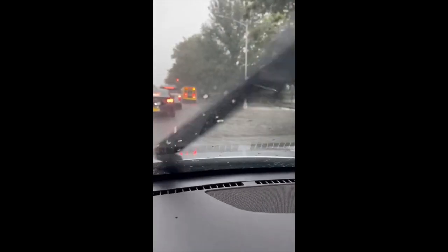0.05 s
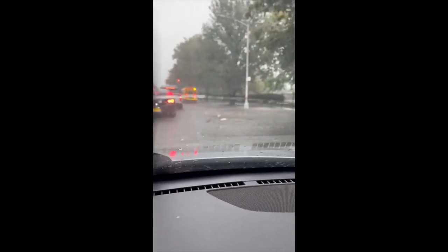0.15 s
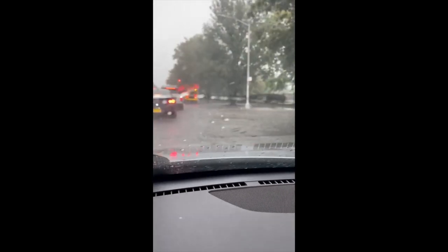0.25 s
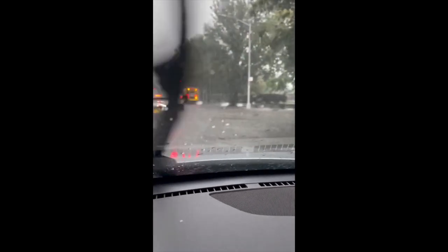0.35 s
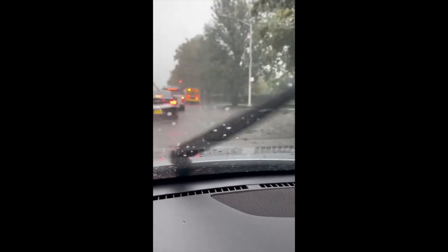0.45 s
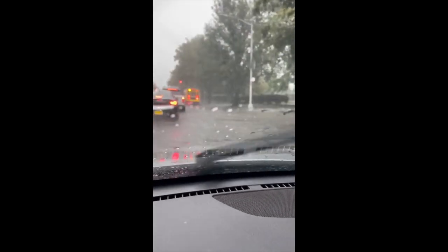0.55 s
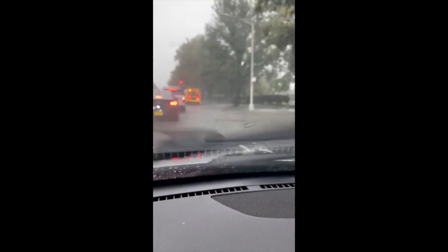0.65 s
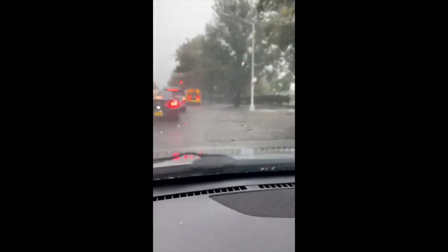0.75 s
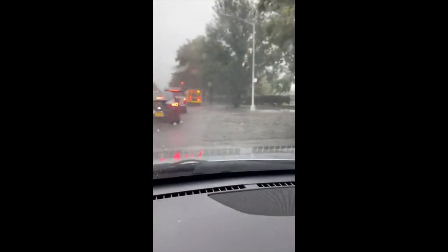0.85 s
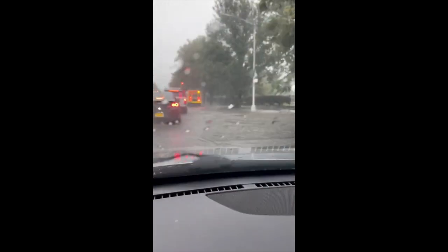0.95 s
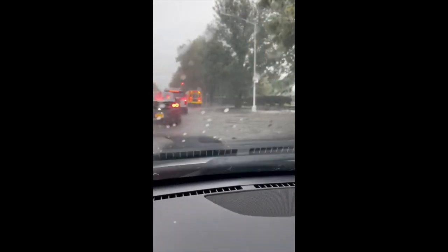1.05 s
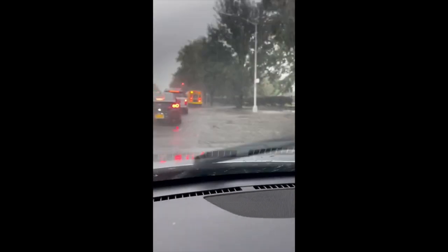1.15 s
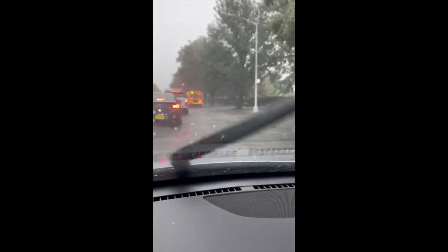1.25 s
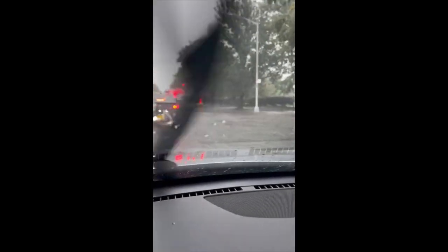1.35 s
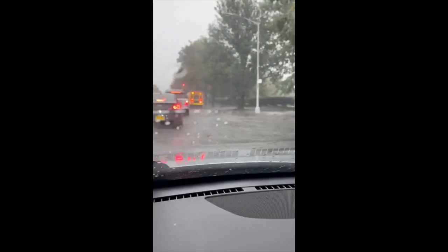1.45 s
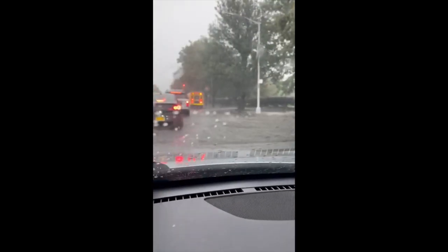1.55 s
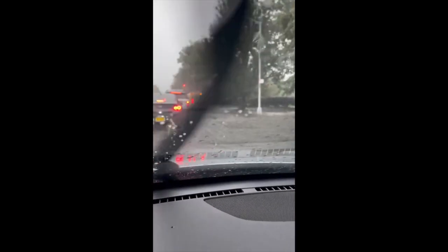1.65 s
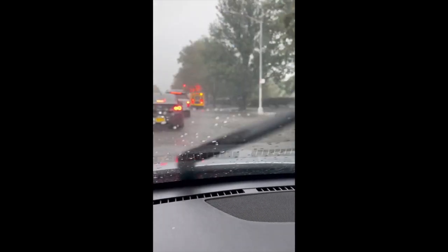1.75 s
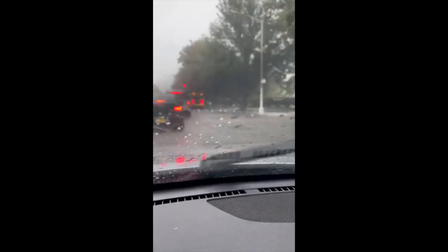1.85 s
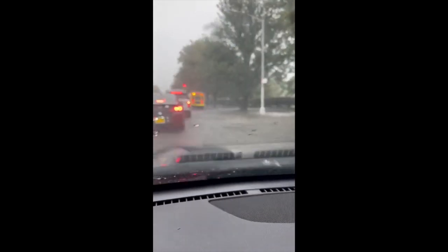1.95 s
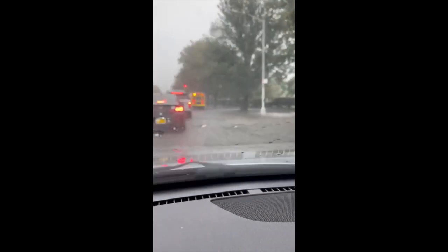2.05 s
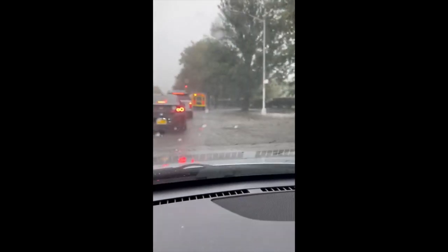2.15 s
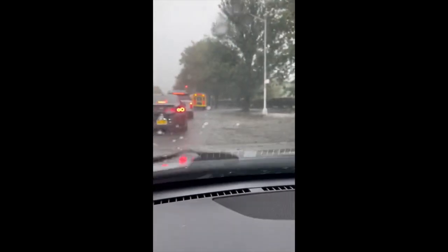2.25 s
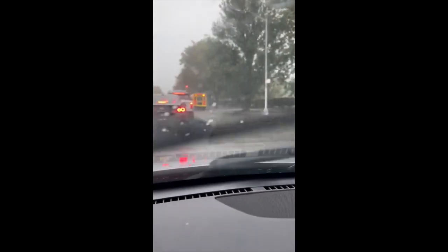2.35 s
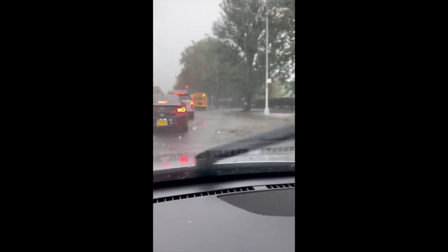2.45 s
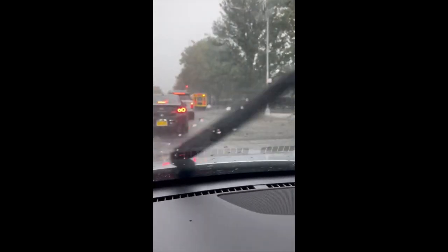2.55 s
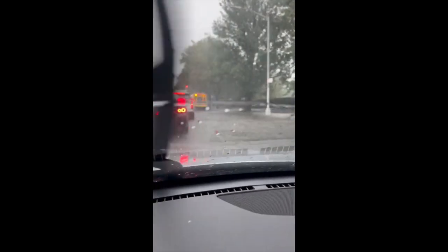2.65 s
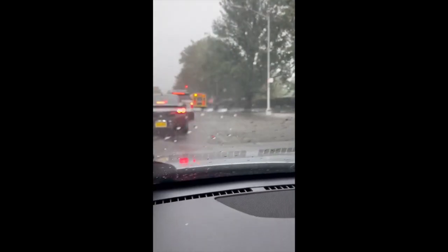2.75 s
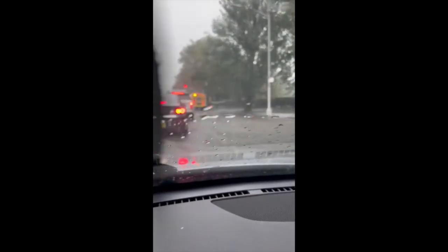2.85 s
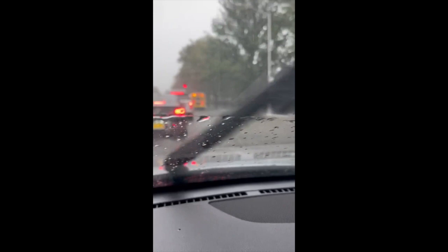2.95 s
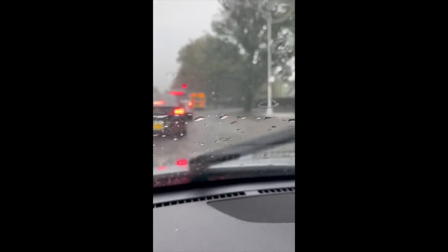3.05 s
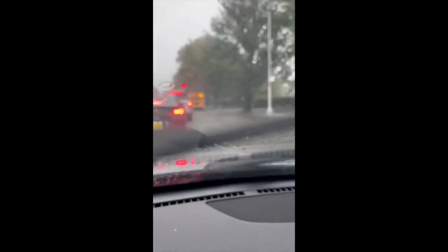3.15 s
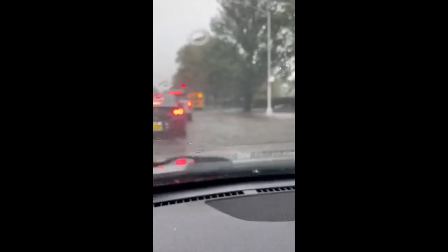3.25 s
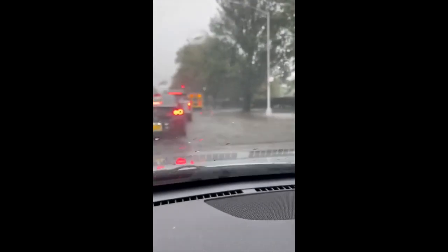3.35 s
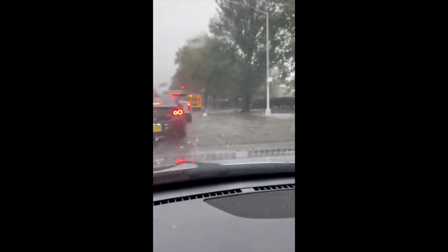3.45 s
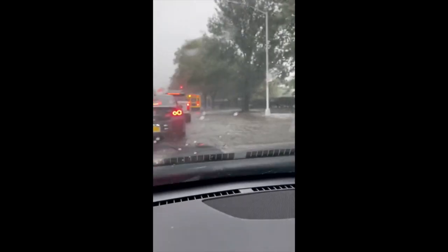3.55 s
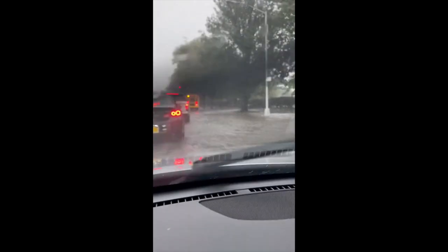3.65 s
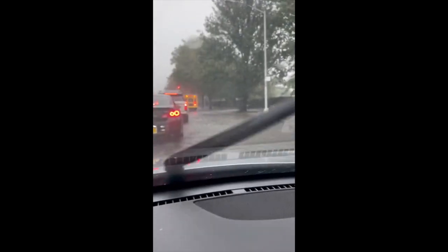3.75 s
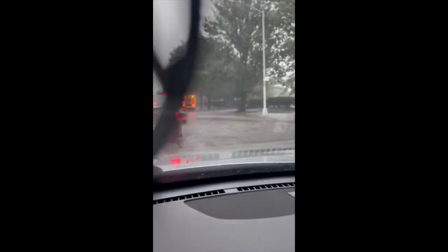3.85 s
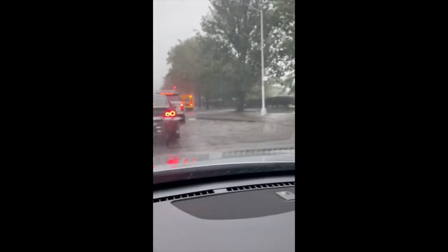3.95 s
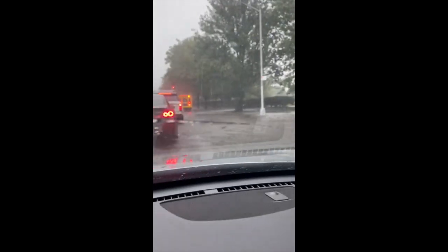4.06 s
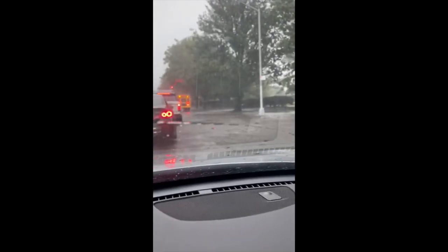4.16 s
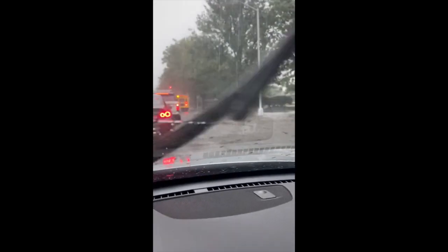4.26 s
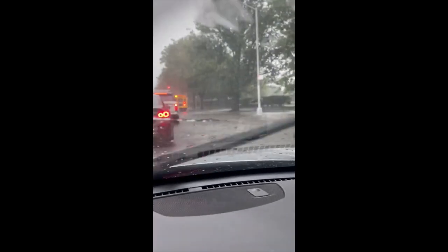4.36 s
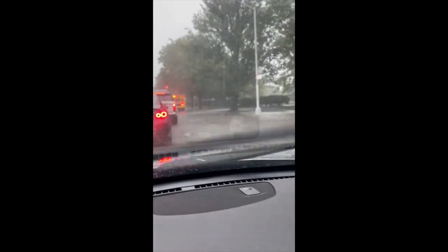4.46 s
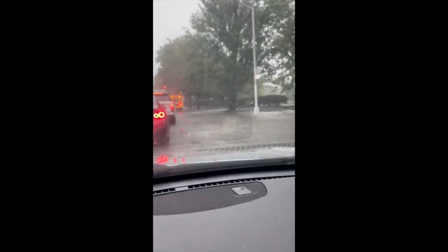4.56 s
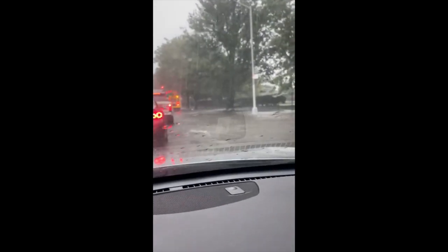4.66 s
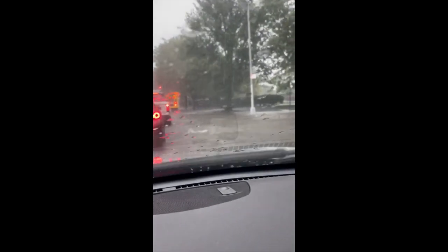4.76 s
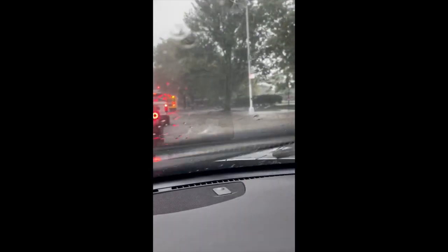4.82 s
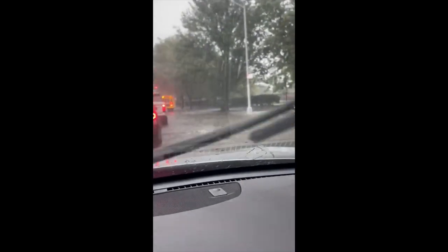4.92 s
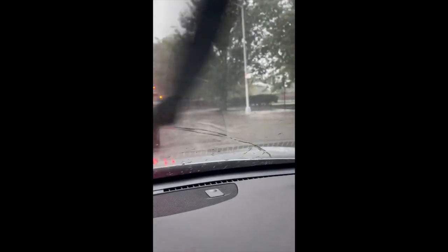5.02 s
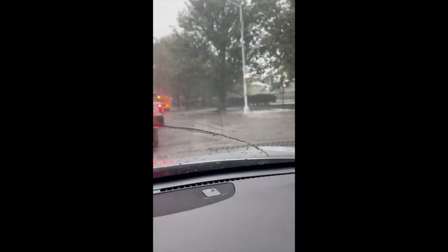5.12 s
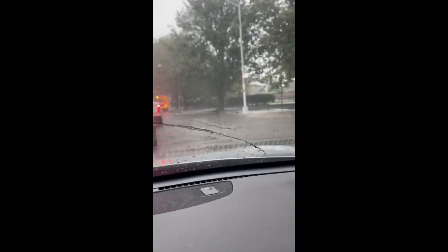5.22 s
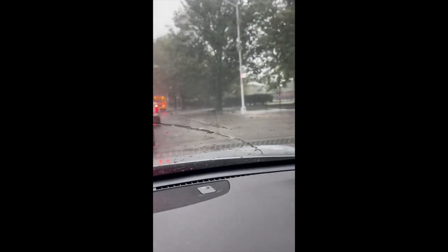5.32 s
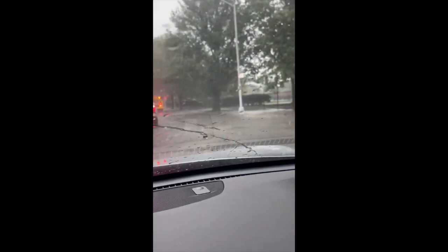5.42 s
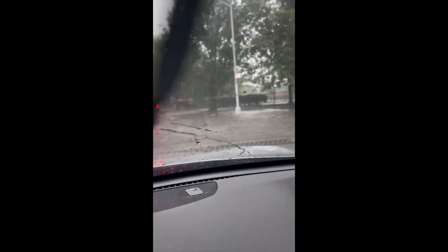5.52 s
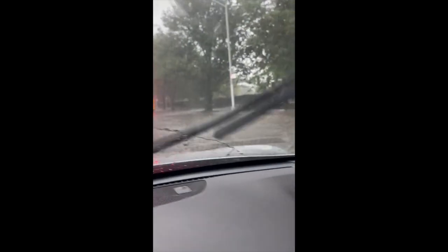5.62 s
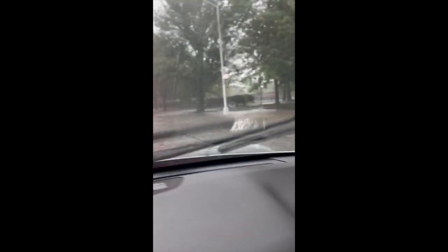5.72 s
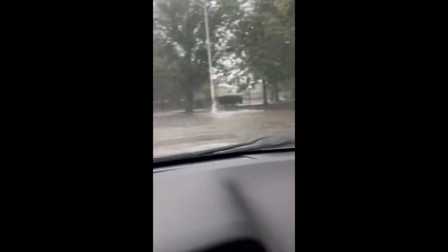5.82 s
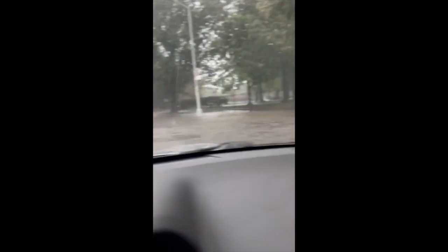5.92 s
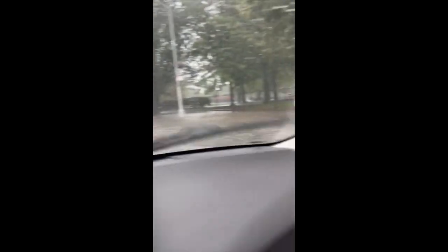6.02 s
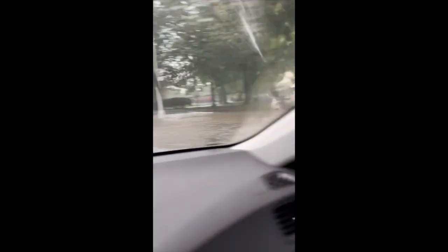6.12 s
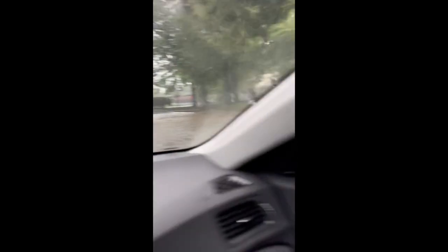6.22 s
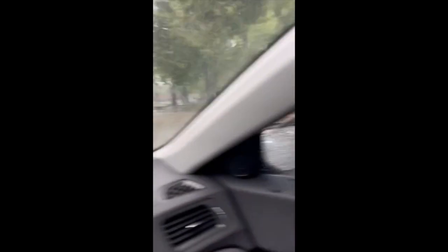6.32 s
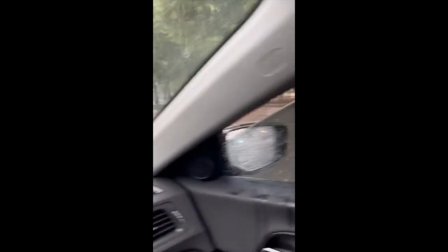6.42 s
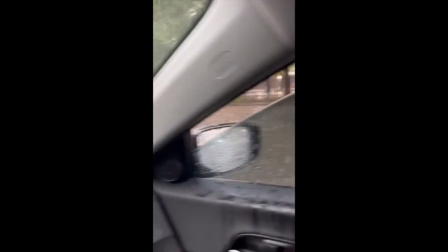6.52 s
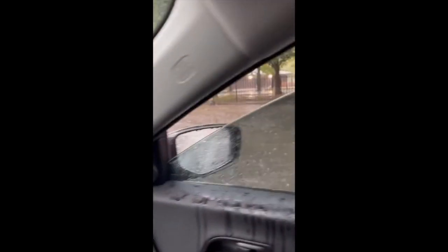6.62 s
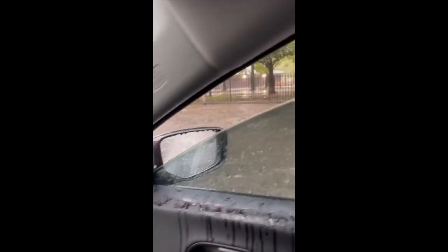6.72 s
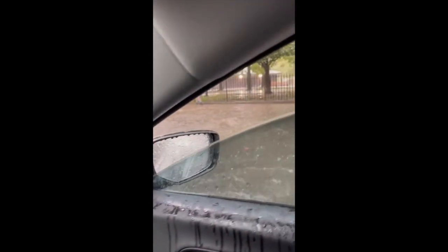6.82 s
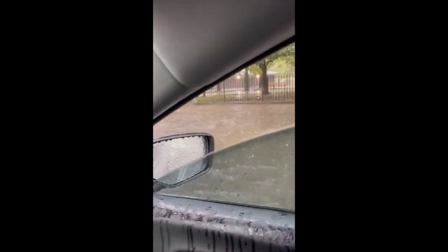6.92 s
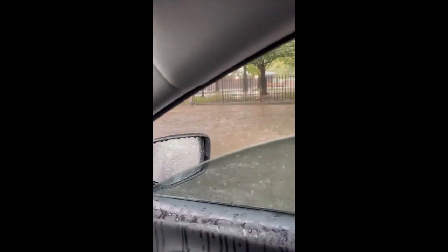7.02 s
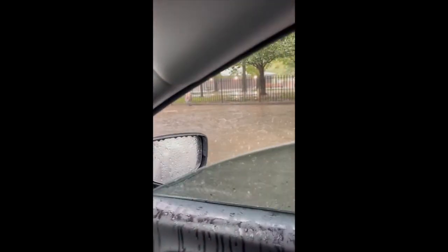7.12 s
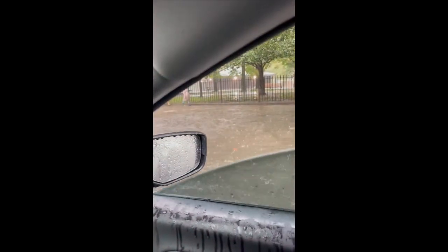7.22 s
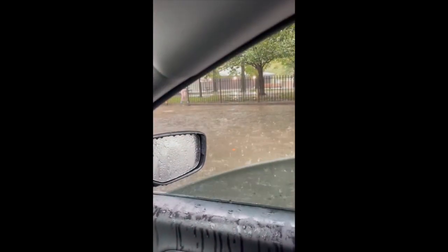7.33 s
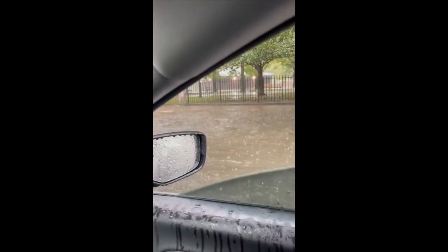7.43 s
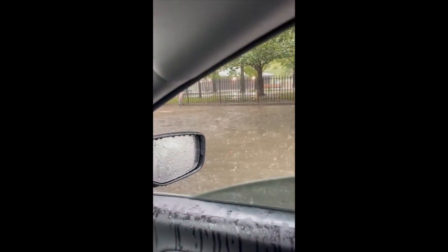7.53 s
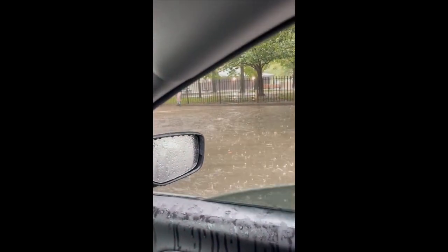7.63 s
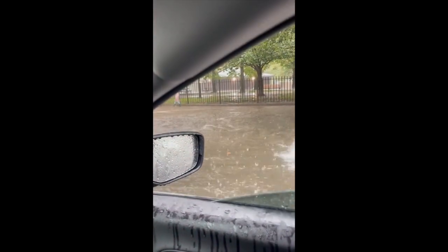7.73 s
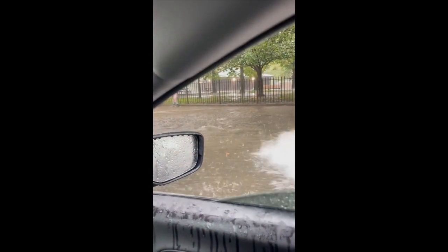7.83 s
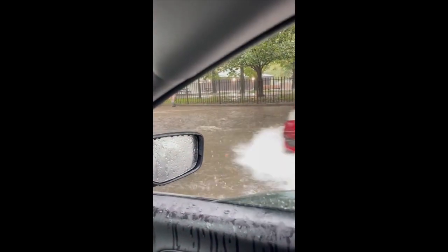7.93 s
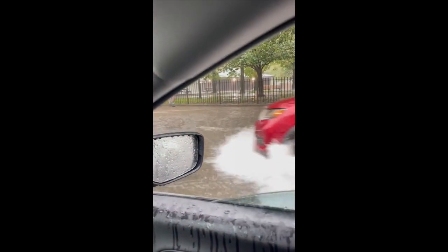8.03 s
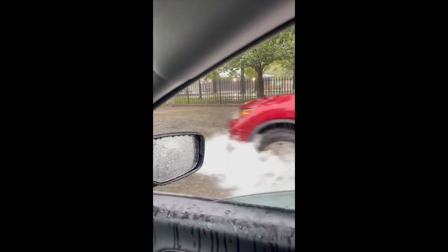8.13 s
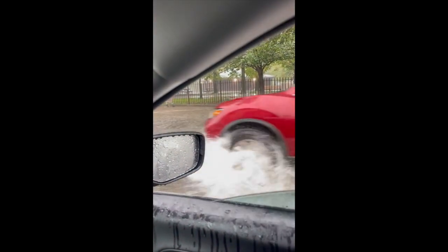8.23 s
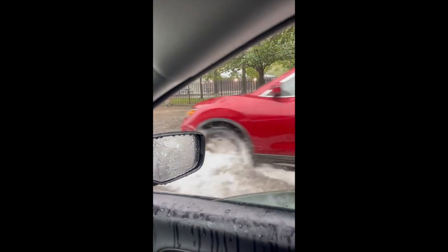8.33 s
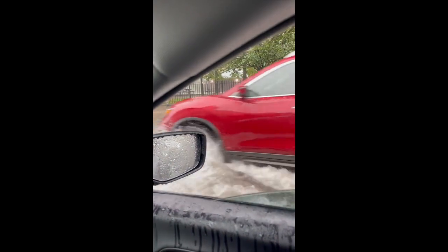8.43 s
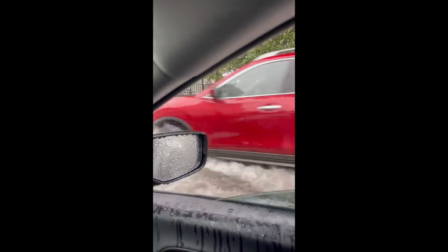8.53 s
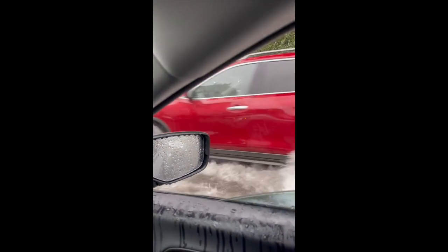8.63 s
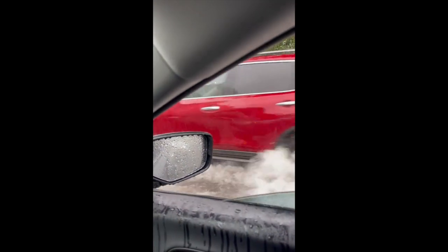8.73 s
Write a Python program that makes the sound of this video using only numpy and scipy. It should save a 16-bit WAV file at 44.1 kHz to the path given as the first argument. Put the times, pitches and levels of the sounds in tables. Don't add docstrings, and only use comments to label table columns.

```python
import sys
import numpy as np
from scipy import signal
from scipy.fft import rfft, irfft, next_fast_len
from scipy.io import wavfile

SR = 44100
rng = np.random.default_rng(int(sys.argv[2]) if len(sys.argv) > 2 else 0)


def invert_db(x):
    u = np.asarray(x, float) / 20
    return 10 ** u


def master(y):
    cut = np.clip(np.atleast_2d(y).T, -1, 1)
    pcm = np.round(cut * 32767)
    wavfile.write(sys.argv[1], SR, pcm.astype(np.int16))


N = 387191
SIZE = next_fast_len(N)
HZ = np.arange(SIZE // 2 + 1) * SR / SIZE + 1e-3
T = np.arange(N) / SR

# [turn_s, panel_db, body_db, rubber_db, water_db]
TOPS = [
    (0.245, -10.5, -17, -22.5, -41),
    (1.505, -9.5, -18, -22.5, -40),
    (2.765, -10.5, -17, -22, -40.5),
    (4.0273, -10, -21, -22.5, -41),
    (5.29, -12, -25, -27.5, -43.5),
    (6.562, -23.5, -24.5, -53, -50),
    (7.804, -26, -33, -21.5, -44),
]
# [turn_s, panel_db, body_db, rubber_db, water_db]
BOTTOMS = [
    (0.8545, -10, -13.5, -28.5, -32),
    (2.116, -9, -12.5, -28, -32),
    (3.3755, -9.5, -13.5, -29, -34),
    (4.6378, -13, -11.5, -32.5, -32.5),
    (5.902, -15.5, -16, -34, -35.5),
    (7.177, -19, -17.5, -26.5, -34),
    (8.431, -16, -15, -41, -34),
]


def rms_one(x):
    return x / np.sqrt(np.mean(x ** 2) + 1e-20)


def filtered(x, order, hz, kind):
    return signal.sosfilt(signal.butter(order, hz, kind, fs=SR, output="sos"), x)


def in_time(rows):
    s, *columns = np.transpose(rows)
    return [np.interp(T, s, c) for c in columns]


def at_hz(points, hz):
    table_hz, value = np.transpose(points)
    return np.interp(np.log(hz), np.log(table_hz), value)


def drift(rate_hz):
    r = np.exp(-80 * np.pi * rate_hz / SR)
    slow = signal.lfilter([1], [1, -2 * r, r * r], rng.standard_normal(N // 40 + 2002))[2000:]
    return np.interp(np.arange(N) / 40, np.arange(len(slow)), rms_one(slow))


def ring(force, hz, t60_s):
    r, w = invert_db(-60 / (t60_s * SR)), 2 * np.pi * hz / SR
    return signal.lfilter([0, np.sin(w)], [1, -2 * r * np.cos(w), r * r], force + 1e-18)


def swell(peak_s, rise_s, fall_s):
    at = np.arange(max(int((peak_s - .15) * SR), 0), min(int((peak_s + .2) * SR), N))
    t = T[at] - peak_s
    return at, np.exp(np.where(t < 0, t / max(rise_s, 1e-4), -t / max(fall_s, 1e-4)))


def drops(spectrum, per_s, uneven_db, patchy_db, gust_db):
    sizes = invert_db(uneven_db * np.minimum(rng.exponential(1, (2, N)), 6)) * rng.standard_normal((2, N))
    impacts = sizes * (rng.random((2, N)) < per_s / SR)
    shower = rfft(impacts, SIZE) * invert_db(at_hz(spectrum, HZ))
    together_db = gust_db * (drift(13.7) + 0.12 * drift(40))
    out = 0
    low, high = np.log2([spectrum[0][0], spectrum[-1][0]])
    for octave in np.arange(low, high + .5, .5):
        band = np.clip(1 - 2 * abs(np.log2(HZ) - octave), 0, 1)
        out = out + irfft(shower * band, SIZE)[:, :N] * invert_db(patchy_db * drift(13.6))
    return rms_one(out * invert_db(together_db))


def hum(rows, wobble_db, wander):
    hz, level_db = in_time(rows)
    on = np.clip(np.minimum(T - rows[0][0] + 0.077, rows[-1][0] + 0.053 - T) / 0.14, 0, 1)
    turns = np.cumsum(hz * (1 + wander * drift(11.0))) / SR
    return on * invert_db(level_db + 2 + wobble_db * drift(12.0)) * np.sin(2 * np.pi * turns)


def each_turn(top_parts, bottom_parts, *columns):
    rows = []
    for turns, parts in ((TOPS, top_parts), (BOTTOMS, bottom_parts)):
        for turn in turns:
            for part in parts:
                levels_db = [turn[c] + level_db for c, level_db in zip(columns, part[1:])]
                rows.append((turn[0] + part[0], *levels_db, *part[1 + len(columns):]))
    return rows


def wiper_knocks():
    # [after_turn_s, panel_db, body_db, direction]
    top_knocks = [
        (-.0005, -1, -13, 1),
        (.0125, -4.5, -4.5, -1),
        (.0565, -14, -6, -1),
        (.0735, 0, -3, -1),
        (.1415, -8, -8.5, -1),
    ]
    # [after_turn_s, panel_db, body_db, direction]
    bottom_knocks = [
        (0.002, -4, -0.5, 1),
        (.07, -8.5, -9, 1),
        (0.0994, 1.5, -14, -1),
        (.1235, -8, -4.5, 1),
        (0.1378, -1, -8, -1),
    ]
    firmness = [(0.5, -1.5, -5, 1, -1), (0.5, 1.5, 0, -0.5, -0.5), (-1, -0.5, 3.5, 0, -2),
                (1.5, -1.5, 1, -1.2, .3), (-0.5, 2, 2, -2.5, -0.5), (-4, .3, 3, 4, .3), (-7, 8, 4, .3, .3),
                (1.5, 1.5, -1.5, .3, -0.5), (0.7, -1, -2.2, 1, -1), (.3, .3, -0.2, 1, 1.8),
                (0, -1, 1.5, -2, -1), (1.5, -1, -0.5, -3, 0), (1.5, -4, -1, -5, -7), (-4, -1, .3, -4, 0)]
    # [start_s, panel_db, body_db, direction]
    jerks = [(5.4, -17, -20, 1), (1.4, -31, -24, 1), (6.1, -25, -17, -1), (11, -36, -20, 1),
             (8.665, -35, -25, 1), (4.752, -18, -32, -1), (5.297, -16, -37, 1), (6.1, -25, -20, 1),
             (7.19, -20, -20, 1), (5.966, -26, -18.5, 1), (6.05, -21, -26, -1), (6.128, -19, -23.5, 1),
             (6.155, -27, -29, 1)]
    # [mode_hz, level_db, t60_s]
    panel = [(144.5, -2, 0.2), (194, 5, 0.17), (221.2, 0, 0.2), (277, 1.5, 0.078), (313, 1.5, 0.04),
             (448, -10.5, 0.052)]
    # [mode_hz, level_db, t60_s]
    body = [(54.6, -35, 0.6), (74.3, 3.5, 0.43), (91, -32, 0.13), (116.3, 1, 0.26)]
    rows = np.array(each_turn(top_knocks, bottom_knocks, 1, 2) + jerks)
    rows[:np.size(firmness), 1:3] += np.ravel(firmness)[:, None]
    at = (rows[:, 0] * SR).astype(int)
    luck = rng.standard_normal((100, 20))[:len(rows)]
    out = np.zeros((2, N))
    for k, (hz, level_db, t60_s) in enumerate(panel + body):
        strength_db = rows[:, 1] - 8.0 if k < len(panel) else rows[:, 2] + 1.13
        late = int(-0.7 * SR * (1 / hz - 1 / 200))
        force = np.zeros(N)
        force[np.minimum(at + late, N - 1)] = invert_db(strength_db + level_db + 2.3 * luck[:, k]) * np.sign(rows[:, 3])
        push = np.hanning(int(1.1 * SR / hz))
        out += ring(signal.fftconvolve(force, push / push.sum())[:N], hz, t60_s)
    return out


def rubber_judder():
    # [after_turn_s, level_db, length_s]
    top_rubs = [
        (-.070, 1, 0.025),
        (-.035, -0.9, 0.023),
        (.074, -8.5, .024),
    ]
    # [after_turn_s, level_db, length_s]
    bottom_rubs = [
        (-.013, 4, 0.015),
        (0.09, 0, 0.012),
    ]
    # [start_s, level_db, length_s]
    seal_rubs = [
        (2.688, -32, 0.007),
        (5.985, -37, .006),
        (6.091, -24.5, 0.015),
        (6.227, -28, 0.014),
        (6.312, -25.5, 0.017),
    ]
    # [mode_hz, width_hz, level_db]
    rubber = [(394, 105, 3), (530, 150, 7.5), (718, 116, 5), (925, 250, -3), (1510, 940, -45)]
    slips = rng.standard_normal((2, N)) * invert_db(2.4 * drift(160))
    slips = rms_one(filtered(slips, 4, 2000, "low"))
    judder, out = np.zeros((2, N)), np.zeros((2, N))
    for s, level_db, length_s in each_turn(top_rubs, bottom_rubs, 3) + seal_rubs:
        at, shape = swell(s + 0.0019, 0.0031, length_s)
        judder[:, at] += invert_db(level_db - 46.5) * np.minimum(1.8 * shape, 1) * slips[:, at]
    for hz, width_hz, level_db in rubber:
        out += invert_db(level_db) * ring(judder, hz, 2.3 / width_hz) * np.sqrt(width_hz / 100)
    return out


def splashes():
    # [after_turn_s, level_db, rise_s, fall_s, centre_hz]
    top_water = [
        (-.005, 0.2, 0.054, 0.016, 3380),
        (.086, 0.5, 0.0033, 0.012, 6100),
    ]
    # [after_turn_s, level_db, rise_s, fall_s, centre_hz]
    bottom_water = [
        (-.003, 1, 0.0091, 0.0093, 4150),
        (.096, -7.5, 0.012, 0.032, 3680),
    ]
    # [start_s, level_db, centre_hz]
    lone_drops = [(0.039, -30, 3980), (0.15, -32, 3500), (2.056, -36, 5000), (3.525, -37, 4500),
                  (3.614, -38, 5530), (3.645, -45, 5000), (4.195, -37, 5000), (3.801, -43, 5000),
                  (5.037, -41, 6000), (5.332, -42, 6500), (5.7, -36, 6000)]
    # [start_s, level_db, rise_s, fall_s, centre_hz]
    switch = [(6.022, -28, 0.000495, 0.0054, 9000), (6.022, -40, .0005, .002, 13000),
              (6.125, -38, .015, .02, 10500), (6.152, -32, .014, .01, 6400),
              (6.135, -32, 0.0069, .012, 3200), (6.157, -31, 0.016, 0.0045, 3000),
              (6.092, -35, 0.0017, .008, 3500), (6.228, -36.5, .003, .012, 2800),
              (6.165, -37, .01, 0.018, 12000), (6.09, -26.5, 0.00088, 0.006, 3070),
              (6.091, -32, .001, .005, 5600), (8.7, -40, 0.004, 0.02, 9100),
              (6.128, -33.5, 0.0055, 0.021, 9800), (6.155, -33, 0.012, .007, 6600),
              (6.14, -35, 0.015, 0.02, 1930), (6.8, -33.5, .003, 0.019, 2700),
              (6.31, -39, .015, 0.059, 2100), (6.445, -34, 0.0069, .008, 1300), (7.4, -43, .02, .02, 10000),
              (5.984, -48, .001, 0.0041, 4900)]
    bursts = [(*row, 1) for row in each_turn(top_water, bottom_water, 4)]
    bursts += [(s, level_db, 0.0011, 0.0024, hz, .9) for s, level_db, hz in lone_drops]
    bursts += [(*row, 0.44) for row in switch]
    grains = drops([(400, 22.0), (9000, 8), (15000, -30)], per_s=13000, uneven_db=2.0, patchy_db=-4.5, gust_db=0.0)
    out = np.zeros((2, N))
    for s, level_db, rise_s, fall_s, centre_hz, octaves in bursts:
        at, shape = swell(s, rise_s, fall_s)
        edges_hz = np.clip(centre_hz * 2.0 ** np.array([-octaves, octaves]), 100, .45 * SR)
        burst = filtered(grains[:, at], 2, edges_hz, "band")
        out[:, at] += invert_db(level_db - 2.5) * shape * rms_one(burst)
    return out


def squeaks_and_flips():
    # [after_turn_s, level_db, pitch_hz]
    top_flips = [
        (-.066, -7, 540),
        (-.028, -7.5, 760),
        (-.011, 1, 402),
        (.086, -9.5, 744),
    ]
    # [after_turn_s, level_db, pitch_hz]
    bottom_flips = [
        (.091, .1, 595),
        (.092, 2.4, 370),
    ]
    # [start_s, level_db, pitch_hz]
    clacks = [(.18, -40, 500), (.229, -23.5, 760), (2.207, -41, 583), (2.694, -31, 556), (4.11, -38, 759),
              (4.727, -29.5, 702), (4.728, -22.5, 390), (5.225, -28, 581), (5.259, -28, 800),
              (5.268, -28, 370), (5.988, -25, 460), (1.587, -34, 453)]
    # [start_s, level_db]
    drips = [
        (.385, -35),
        (.555, -45),
        (2.903, -41),
    ]
    # [peak_s, pitch_hz, level_db, glide_hz_per_s]
    rows = [(s - 0.092, 2190, rubber_db - 26.5, 3800) for s, _, _, rubber_db, _ in TOPS]
    rows += [(s, 1930, level_db, 0) for s, level_db in drips]
    rows += [(s, hz, level_db, 0) for s, level_db, hz in each_turn(top_flips, bottom_flips, 3) + clacks]
    out = np.zeros((2, N))
    for s, hz, level_db, glide in rows:
        at, shape = swell(s, 0.0016 + glide / 230000.0, 0.0054 + glide / 320000.0)
        t = T[at] - s
        steps = rng.standard_normal(len(at) // 90 + 1).repeat(90)[:len(at)]
        rough = invert_db(glide / 700 * steps)
        out[:, at] += invert_db(level_db) * shape * rough * np.sin(2 * np.pi * (hz + glide * t / 2) * t)
    return out


def cabin_rain():
    # [time_s, level_db]
    strength = [(0.0, -43.5), (.41, -42), (1.25, -44.5), (1.93, -45), (2.74, -44.5), (3.28, -47),
                (3.75, -50), (4.47, -47.5), (5.2, -49), (5.79, -48.5), (6.1, -46), (6.5, -39.5),
                (7.0, -27.5)]
    # [band_hz, density_db]
    roof = [(70, -2), (130, 2), (200, 0), (300, -4.5), (450, -5.5), (600, -12), (780, -10.5), (1000, -20.5),
            (1600, -26), (3000, -32.5)]
    # [band_hz, density_db]
    glass = [(500, 2.5), (1000, 4.5), (1600, 0.5), (3000, -2), (5500, -3.5), (8000, -4.5), (9800, -8),
             (11000, -17), (12000, -30), (15000, -40)]
    patter_db, = in_time(strength)
    drum_db = -35.5 + 0.41 * np.minimum(patter_db + 46.0, 4)
    shut = np.interp(T, [6.2, 7.2], [1, .05])
    out = invert_db(drum_db) * drops(roof, per_s=4000, uneven_db=1.5, patchy_db=2.0, gust_db=1.3)
    out += invert_db(patter_db + 2.0) * drops(glass, per_s=7000, uneven_db=1.0, patchy_db=1.4, gust_db=-0.03)
    return shut * out


def shake():
    out = np.zeros(N)
    for s, _, body_db, *_ in TOPS + BOTTOMS:
        at, shape = swell(s + 0.12, 0.094, 0.11)
        out[at] += 2.5 * invert_db(body_db + 19) * shape
    return out


def body_boom():
    # [time_s, level_db]
    sway = [(0.0, -30), (0.46, -25), (0.68, -31), (1.07, -26.5), (1.27, -30), (1.54, -28.5), (1.96, -32.5),
            (2.25, -25), (2.44, -32), (3.52, -28.5), (4.35, -36), (4.72, -29.5), (5.75, -35), (6.07, -29.5),
            (6.38, -32), (8.0, -29.5), (8.36, -34), (8.78, -26)]
    # [band_hz, density_db]
    spectrum = [(25, -45), (36, -14), (50, -0.5), (70, -7.5), (100, -7), (150, -33), (250, -25)]
    boom_db = -2.5 + in_time(sway)[0] + shake()
    return invert_db(boom_db) * drops(spectrum, per_s=1700, uneven_db=3.0, patchy_db=1.0, gust_db=1.0)


def idling_engine():
    # [time_s, pitch_hz, level_db]
    idle = [(0.0, 47.5, -20.5), (.6, 47.96, -28), (1.25, 47.53, -26.5), (1.9, 47.94, -28),
            (2.5, 48.55, -27), (3.05, 49.05, -33), (3.25, 49.5, -26.5), (3.8, 49, -26.5), (4.35, 48.5, -33),
            (5.0, 48.5, -26.5), (5.6, 48.5, -30), (6.3, 47.97, -27), (7.0, 48.2, -32.5), (8.3, 47.2, -56),
            (8.78, 47.2, -22)]
    return invert_db(-4.5) * hum(idle, wobble_db=4.5, wander=0.0746)


def window_motor():
    # [time_s, pitch_hz, level_db]
    winder = [(6.2, 110, -54), (6.5, 109.9, -32.5), (6.75, 106.4, -35), (7.1, 105.5, -33),
              (7.5, 104.6, -33), (8.2, 104, -37)]
    return hum(winder, wobble_db=2.5, wander=0.0201)


def ticks():
    # [start_s, level_db]
    clicks = [
        (1.8224, -41),
        (3.645, -54.5),
        (6.022, -35),
    ]
    # [start_s, level_db, rise_s, fall_s]
    rustle = [
        (6.116, -50, .008, 0.013),
        (6.135, -51, .01, .012),
    ]
    hiss = filtered(rng.standard_normal(N), 2, [6000, 14000], "band")
    out = np.zeros(N)
    for s, level_db, rise_s, fall_s in [(*row, 0.00028, 0.0026) for row in clicks] + rustle:
        at, shape = swell(s, rise_s, fall_s)
        out[at] += invert_db(level_db) * shape * hiss[at]
    return out


def gap(x):
    dip = np.clip(1 - abs(np.log2(HZ / 3100)) / 0.41, 0, 1)
    narrow = np.interp(T, (6.8, 7.55), [0.38, 0])
    return x - narrow * irfft(rfft(x, SIZE) * dip, SIZE)[:, :N]


def flooded_street():
    # [time_s, level_db]
    loudness = [(6.4, -47.5), (6.63, -47), (6.92, -43), (7.37, -37), (7.72, -33.5), (7.94, -32.5),
                (8.22, -32), (8.5, -32.5), (8.78, -33.5)]
    # [time_s, level_db]
    bow_wave = [(6.3, -47), (6.7, -43), (7.05, -39), (7.3, -34), (7.6, -30), (7.9, -28.5), (8.15, -28),
                (8.45, -28), (8.78, -30.5)]
    # [band_hz, density_db]
    spray = [(900, -9.5), (2000, -3.5), (3500, -2.5), (5000, -4), (6500, -2), (8200, 0.5), (9800, -2.5),
             (11500, -12.5), (13000, -21), (15200, -19)]
    # [band_hz, density_db]
    wash = [(40, -27), (80, 7.5), (150, 3.5), (300, 2.5), (500, -1.5), (800, -8.5), (1500, -27)]
    # [band_hz, density_db]
    churn = [(300, -13), (600, -1.5), (900, .5), (1300, -2), (1800, -9), (3000, -15), (5000, -24.5)]
    spray_db, = in_time(loudness)
    wash_db = -22.5 + 0.75 * (spray_db + 31)
    churn_db = 1.5 + in_time(bow_wave)[0]
    out = invert_db(spray_db + 8.0) * drops(spray, per_s=25000, uneven_db=0.5, patchy_db=1.04, gust_db=0.5)
    out += invert_db(wash_db) * drops(wash, per_s=8000, uneven_db=1.5, patchy_db=-0.86, gust_db=0.2)
    out += invert_db(churn_db) * drops(churn, per_s=15000, uneven_db=-1.5, patchy_db=1.65, gust_db=0.56)
    opening = np.clip((T - 6.1) / 0.61, 0, 1)
    return opening * gap(out)


def passing_engine():
    # [time_s, pitch_hz, level_db]
    passer = [(7.45, 183.3, -35), (7.8, 188, -27.5), (8.2, 188.6, -35.5), (8.45, 180.9, -35.5),
              (8.78, 174.2, -23.5)]
    return hum(passer, wobble_db=4.0, wander=0.023)


def ports(pair, turns, alike, lean):
    first, second = rfft(pair, SIZE)
    half_turns = np.interp(HZ, *np.transpose(turns))
    unlocked = np.clip(abs(half_turns - np.round(half_turns)) / .15 + (HZ < 5500), 0, 1)
    c = 1 - (1 - at_hz(alike, HZ)) * unlocked
    half = invert_db(at_hz(lean, HZ) / 2)
    right = (c * first + np.sqrt(1 - c * c) * second) * np.exp(-1j * np.pi * half_turns) / half
    return irfft(np.array([first * half, right]), SIZE)[:, :N]


def scene():
    # [band_hz, half_turns]
    turn_inside = [(300, 0), (800, .12), (1300, -.12), (1900, .05), (2800, .82), (3200, .1), (4200, .33),
                   (4850, 1), (5750, 2), (6250, 2), (8800, 3), (9600, 3), (10900, 3.62), (11300, 4)]
    # [band_hz, likeness_0_to_1]
    alike_inside = [(90, 1), (300, .97), (650, .55), (1200, .22), (1850, .78), (2300, .27), (3150, .12),
                    (4000, .58), (4500, .5), (4850, .8), (5300, .68), (6500, .84), (9900, .8), (11000, .45)]
    # [band_hz, lean_db]
    lean_inside = [(40, .1), (130, .5), (300, 1.5), (600, 4.3), (950, 4), (1400, -.5), (2000, 0),
                   (4600, -1), (5500, 1), (5750, 0)]
    # [band_hz, half_turns]
    turn_street = [(2050, 0), (2600, .32), (2900, .13), (4200, .25), (4600, .55), (4850, 1), (5750, 2),
                   (6250, 2), (8800, 3), (9600, 3), (11300, 3.62), (11750, 4), (13750, 4), (14600, 4.95)]
    # [band_hz, likeness_0_to_1]
    alike_street = [(250, 1), (800, .87), (1400, .9), (1750, 1), (2050, 1), (2700, .5), (3400, .74),
                    (4500, .48), (4850, .7), (5400, .63), (6800, .73), (8300, .85), (11300, .56),
                    (14300, .3)]
    # [band_hz, lean_db]
    lean_street = [(250, 0), (600, 1), (1100, 5), (1750, 0), (4400, 0), (5000, -2.5), (5500, 1), (5750, 0)]
    inside = wiper_knocks() + rubber_judder() + splashes() + squeaks_and_flips()
    inside += cabin_rain() + body_boom() + idling_engine() + window_motor()
    street = flooded_street() + passing_engine()
    cabin_heard = ports(inside, turn_inside, alike_inside, lean_inside)
    street_heard = ports(street, turn_street, alike_street, lean_street)
    return ticks() + cabin_heard + street_heard


def roll_off(x):
    return signal.sosfilt(signal.butter(12, 15070, fs=SR, output="sos"), x)


def record(dry):
    mix = filtered(dry, 4, 38, "high")
    return roll_off(mix)


dry = scene()
out = record(dry)
master(out)
```